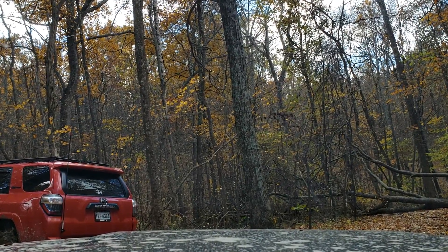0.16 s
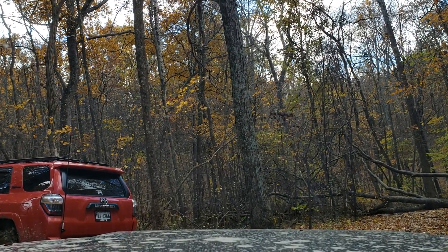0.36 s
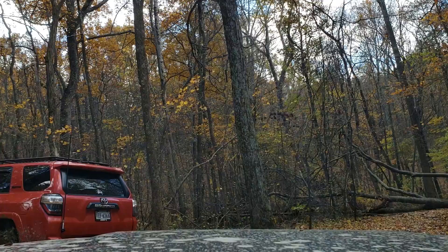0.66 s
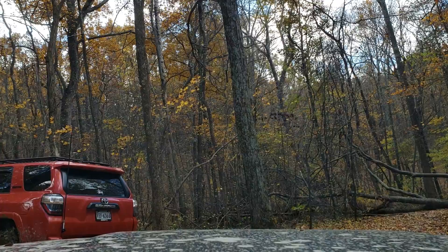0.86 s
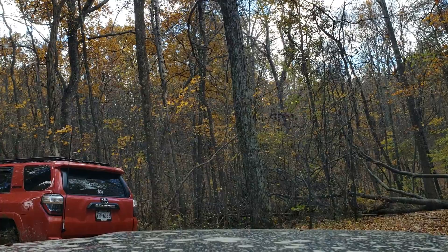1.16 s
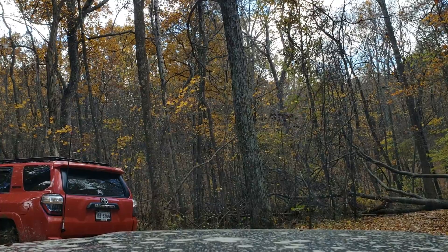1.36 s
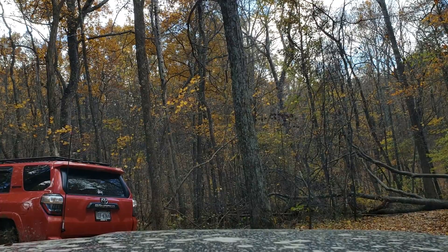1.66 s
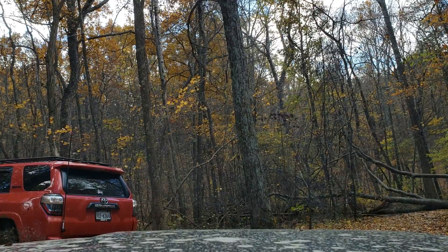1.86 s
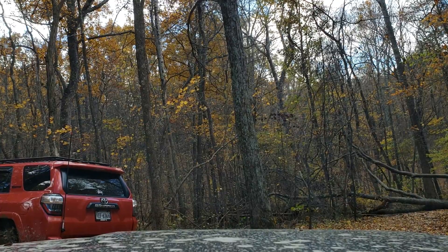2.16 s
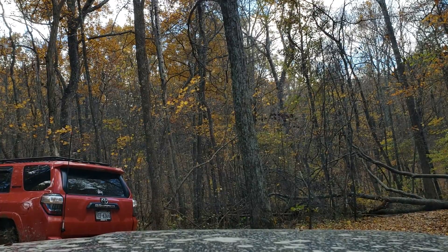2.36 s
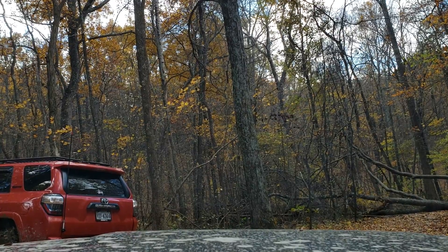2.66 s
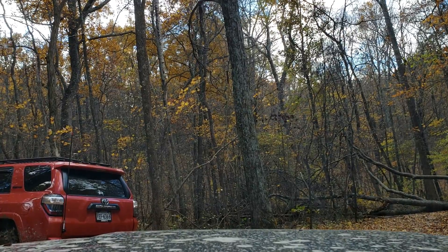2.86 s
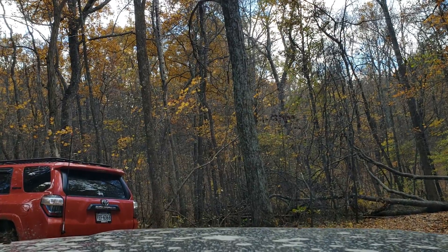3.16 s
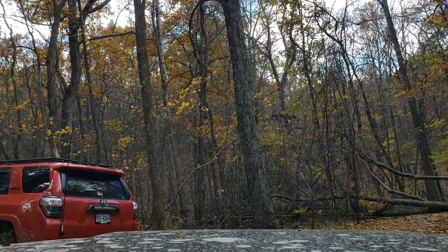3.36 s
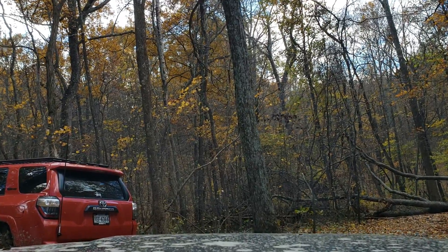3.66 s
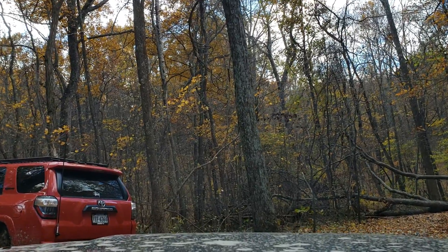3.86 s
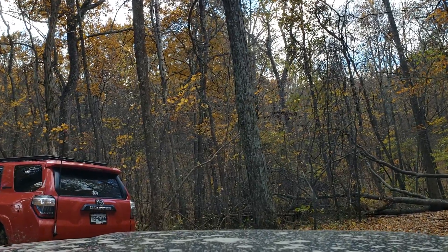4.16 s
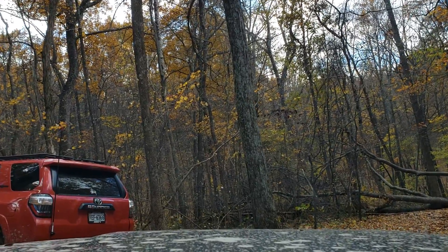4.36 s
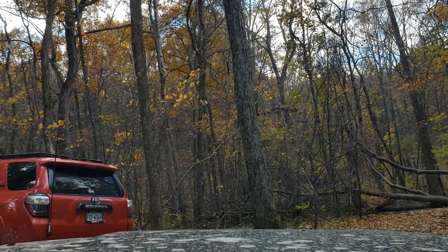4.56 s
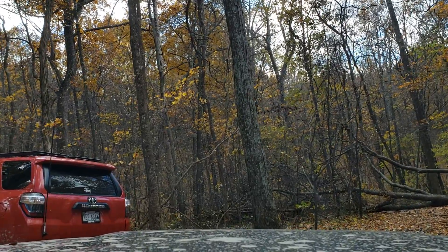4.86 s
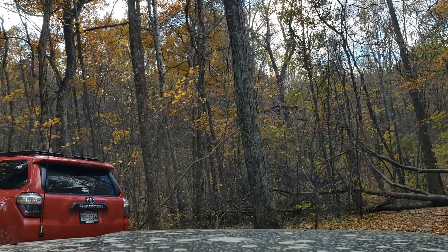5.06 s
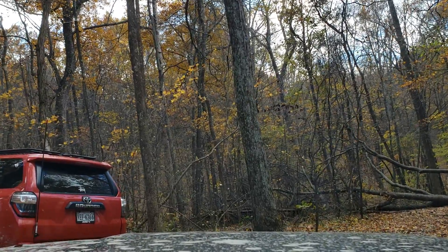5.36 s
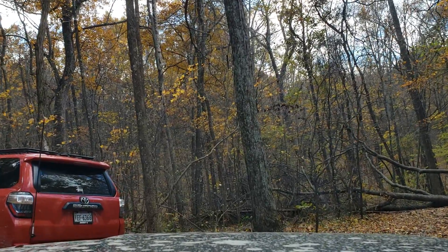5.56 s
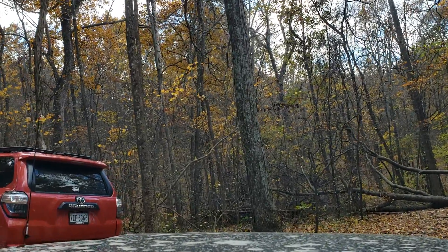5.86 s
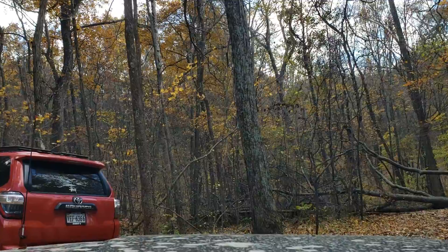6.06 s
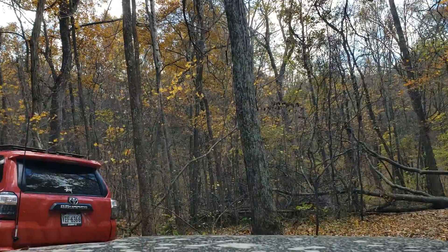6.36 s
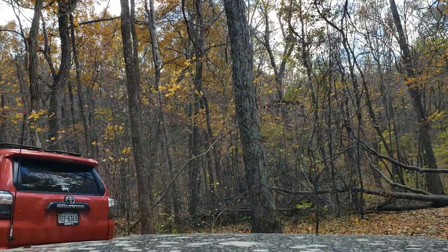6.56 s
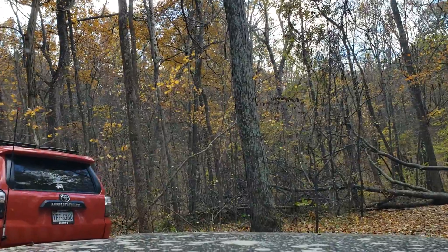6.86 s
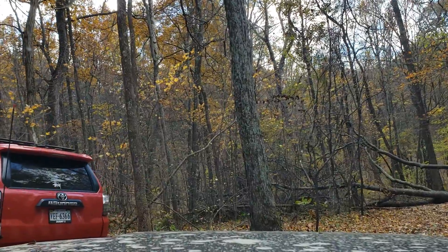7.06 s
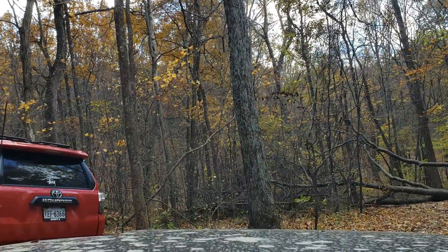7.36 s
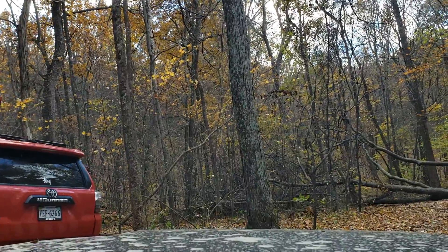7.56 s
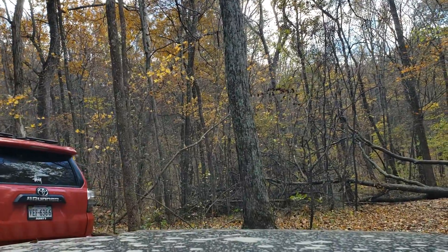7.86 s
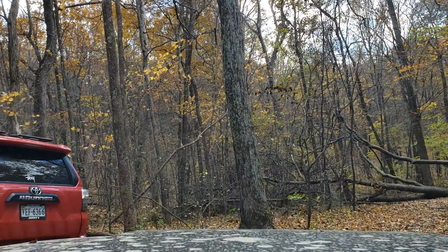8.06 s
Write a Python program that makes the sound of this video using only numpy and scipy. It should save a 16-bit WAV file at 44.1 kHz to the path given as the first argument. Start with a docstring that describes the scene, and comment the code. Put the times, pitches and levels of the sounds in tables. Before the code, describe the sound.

A throbbing idle and rustling clothes, a heavy car door slam near three seconds, then a dull cabin hum with small fading ticks.

```python
"""Inside a car on a forest trail: from the start a six-cylinder engine idles, loud and bright through the open
door, as phase-locked tones, ringing knocks, a faint whine and noise. Cloth rustles (grainy noise), then the trim
is knocked and small parts tick (noise bursts). The door is pulled at 2.3 s and slams at 2.8 s: pressure dips,
ringing shell modes, rattles, a latch ping. The shut cabin keeps the low throb, uneven knocks and whine, with
ever quieter cloth and ticks. Heard at two microphone ports a hand apart."""
import sys
import numpy as np
from scipy import signal
from scipy.fft import rfft, irfft
from scipy.io import wavfile
from scipy.ndimage import uniform_filter1d

SR = 44100
rng = np.random.default_rng(int(sys.argv[2]) if len(sys.argv) > 2 else 0)


def volts(x):
    """Linear amplitude factor 10**(x/20) for a level x in dB, scalar or array-like."""
    e = np.asarray(x, float) / 20
    return 10 ** e


def log_audio(samples):
    """Write samples as a 16-bit WAV file to the path given in sys.argv[1]."""
    # one column per channel
    frames = np.atleast_2d(samples).T
    # limit to full scale, then quantise
    limited = np.clip(frames, -1, 1)
    pcm = np.round(limited * 32767).astype(np.int16)
    wavfile.write(sys.argv[1], SR, pcm)


N = 362502
T = np.arange(N) / SR
HZ = np.fft.rfftfreq(N, 1 / SR)

SHUT_S = 2.79
# left port hears later with the door open, earlier once shut
LAG_OPEN_S, LAG_SHUT_S, LAG_SHUT_HANDLED_S = 0.0004, -0.0004, -0.00012

# engine firing rate: (time [s], rate [Hz])
FIRING_RATE = [(0.0, 38.6), (0.75, 38.31), (2.45, 39.2), (2.65, 37.06), (2.93, 40.3), (3.2, 40.08),
               (3.66, 38.41), (4.3, 37.87), (4.72, 35.83), (5.2, 37.27), (5.72, 36.8), (6.09, 37.47),
               (7.16, 36.43), (7.51, 37.04), (8.22, 37.55)]
# engine loudness: (time [s], throb level [dB], rumble level [dB])
ENGINE_LOAD = [(0.0, -53.5, -42.5), (0.66, -51, -44.5), (1.77, -53, -44.5), (2.4, -50.5, -40.5),
               (2.75, -58.5, -42.5), (3.25, -60.5, -43.5), (3.8, -54, -48.5), (4.05, -53, -43),
               (5.1, -55, -45.5), (6.5, -52, -48.5), (8.22, -52, -47)]
# firing tones, door open: (multiple of firing rate, relative level [dB])
TONES_OPEN = [(0.5, -26), (1, 3.5), (1.5, -5.5), (2, 0.5), (2.5, -16), (3, -8.5), (3.5, -1.5), (4, -16),
              (4.5, -14), (5, -25.5), (5.5, -24), (6, -2), (6.5, -19), (7, 2), (7.5, -24.5), (8, -23.5),
              (8.5, -13.5), (9, -10.5), (9.5, -20), (10, -31.5), (18, -26)]
# firing tones, door shut: (multiple of firing rate, relative level [dB])
TONES_SHUT = [(0.5, -21), (1, 8.5), (1.5, -12), (2, -7.5), (2.5, -21.5), (3, 0.5), (3.5, -12), (4, -14),
              (4.5, -7), (5, -18), (5.5, -16), (6, 0), (6.5, -9), (7, -6), (7.5, -14.5), (8, -5),
              (8.5, -34.5), (9, -9), (9.5, -28.5), (10, -37.5), (18, -21)]
FUNDAMENTAL_SAG_DB_PER_S = -1.5  # tone at the firing rate, after the door shuts
# steady whine tones: (frequency [Hz], level [dB])
WHINE = [(708, -74.5), (2126, -87.5), (4679, -87), (5110, -94), (5528, -89.5), (6380, -88.5), (6806, -90)]
# block modes struck by each firing:
# (frequency [Hz], t60 [s], relative levels of the six cylinders in firing order [dB])
BLOCK_MODES = [(336.8, 0.087, (-46, -55, -56.5, -43.5, -40, -44.5)),
               (703.3, 0.075, (-54.5, -60, -58.5, -58.5, -57, -52.5)),
               (934.5, 0.087, (-63.5, -68.5, -65.5, -50, -65.5, -62.5)),
               (1170, .05, (-74.5, -71, -70, -70.5, -62, -70))]
KNOCK_DB_PER_HZ, IDLE_HZ = -1.5, 37  # knocks soften above idle
# engine rumble spectrum: (frequency [Hz], relative density [dB per Hz])
RUMBLE_SPECTRUM = [(12, -32), (20, 0), (120, -1), (180, -6), (260, -13), (340, -17), (390, -24), (505, -27),
                   (700, -30), (910, -50)]
# engine hiss spectrum, door open: (frequency [Hz], relative density [dB per Hz])
HISS_OPEN_SPECTRUM = [(180, -33), (300, 0), (545, -5), (656, -8), (1020, -5.5), (1700, -10), (2880, -13),
                      (3420, -12.5), (7370, -24), (9000, -23.5), (11700, -59), (19800, -120)]
# engine hiss spectrum, door shut: (frequency [Hz], relative density [dB per Hz])
HISS_SHUT_SPECTRUM = [(300, -18), (420, -2.5), (560, -4.5), (800, -7.5), (1200, -10), (1500, -19),
                      (3000, -32.5), (4000, -59.5)]
HISS_OPEN_DB, HISS_SHUT_DB = -54.5, -64.5
# swelling hum: (middle [s], frequency [Hz], glide [Hz per s], level [dB], length [s])
BOOMS = [(1.701, 134.5, 3, -51, 1), (3.5, 126.3, -3, -40.5, 0.12), (4.099, 119.3, 25.5, -47.5, .3),
         (4.446, 87, -0.5, -50, 0.28), (4.8, 176, 25, -47, 0.65), (5.6, 68.1, -52, -54, 0.54),
         (5.998, 106.3, -2, -46.5, 0.16), (7.151, 140.1, 25, -44.5, 0.48), (7.7, 140.4, 1.5, -48.5, 0.58)]

# background noise spectrum: (frequency [Hz], relative density [dB per Hz])
FLOOR_SPECTRUM = [(1180, -34.5), (2000, -11), (2130, -8), (2300, -10.5), (2800, -11), (4050, -5),
                  (4590, -7.5), (5770, -6), (6700, 1), (8580, -11), (15200, -9), (16100, -19.5),
                  (16500, -30.5)]
FLOOR_DB = -73.5

# cloth spectrum, door open; its treble serves throughout: (frequency [Hz], relative density [dB per Hz])
CLOTH_SPECTRUM = [(710, -34), (1200, -3.5), (1690, -2), (1840, -8), (2700, -1), (3330, -0.5), (4990, -0.5),
                  (6640, -1), (7170, 0), (8170, -6), (9740, -7.5), (11600, -2), (16000, -7.5),
                  (16500, -33.5)]
# cloth nearer the left port, door shut: (frequency [Hz], relative density [dB per Hz])
CLOTH_SHUT_SPECTRUM = [(1060, -25.5), (1800, -5.5), (3320, -7), (4850, -1.5), (5630, -8), (7430, -3),
                       (8940, -11), (15200, -8), (16000, -11), (16500, -31)]
# cloth fidgeting on the seat until it comes to rest: (time [s], level [dB])
FIDGET = [(0.0, -62.5), (.09, -57.5), (.55, -56.5), (.85, -62), (.98, -62.5), (1.22, -58), (1.37, -55),
          (1.66, -58.5), (1.75, -62), (2.05, -55.5), (2.62, -62.5), (2.74, -70), (2.95, -62), (3.02, -68),
          (3.42, -65), (3.73, -73), (3.8, -67.5), (4.0, -66.5), (4.43, -67.5), (4.79, -66), (5.1, -69),
          (5.76, -72.5), (5.86, -93)]
# single strokes of cloth: (start [s], hold [s], level [dB], release by 20 dB [s])
STROKES = [(0.525, .02, -53.5, .05), (0.77, 0.018, -56.5, .05), (1.039, 0.096, -45, 0.039),
           (1.767, 0.2, -52.5, 0.032), (2.166, 0.17, -50.5, 0.6), (2.694, .01, -65, .03),
           (3.007, .015, -59.5, 0.032), (3.08, 0.033, -62, .04), (3.412, 0.028, -57.5, 0.046),
           (3.478, 0.071, -62, 0.15), (4.328, 0.037, -63.5, 0.081), (4.875, 0.065, -61, .06),
           (7.393, 0.082, -75.5, .1), (7.528, 0.031, -74.5, 0.056)]
STROKE_ATTACK_S = 0.03
# door open and shut: treble against body, and left minus right
FIDGET_TOP_DB, STROKE_TOP_DB, CLOTH_PAN_DB = (-3.5, -6.5), (-1, -4), (-0.5, 4.5)

# knocks on the door trim: (time [s], level [dB], tilt about 1 kHz [dB per octave])
TRIM_HITS = [(.089, -38.5, 1.1), (.545, -47, -1.5), (2.221, -46, -6), (2.229, -38.5, -5.5),
             (2.259, -52, -1.5)]
# trim bands: (centre [Hz], width [octaves], relative level [dB], t60 [s], left minus right [dB])
TRIM_BANDS = [(358, 1.3, 0.9, 0.14, 2.8), (1165, 0.55, 5.5, 0.054, .3), (1565, 0.26, -3, 0.068, -2.5),
              (3413, 1.6, -2.2, 0.066, 12.5)]
# small hard parts tick: (time [s], level [dB], centre [Hz], width [octaves], left minus right [dB])
TICKS = [(.665, -38.5, 2650, 1.6, 1), (.798, -46, 7010, 3.1, 5), (1.157, -30.5, 5100, 1.1, 11.5),
         (1.454, -42.5, 3444, 2.28, 1), (1.785, -44, 3260, 0.49, 9), (1.951, -37, 9000, 9.1, -10.5),
         (2.68, -48.5, 4530, 0.82, 14), (2.911, -45, 5450, 4.1, 15), (3.061, -39, 5480, 2.2, 12.5),
         (3.121, -51.5, 5080, 2.6, 10), (3.436, -43.5, 7440, 2.6, 13), (3.45, -47, 538, .5, 2),
         (3.454, -37.5, 5800, 1.5, 16), (3.586, -45, 1350, 2, 10), (3.756, -52, 650, 1.196, 5),
         (3.758, -48.5, 5027, 5.7, 10.5), (3.829, -46.5, 2400, .47, 6), (3.842, -51.5, 4930, 1.21, 11),
         (3.906, -54.5, 6050, 1.61, 9.5), (3.98, -50.5, 3000, 3.02, 7.5), (4.032, -56.5, 4450, 1.5, 13.5),
         (4.351, -47, 6000, 2.1, 13.5), (4.37, -46, 5040, 1.35, 14), (4.41, -54.5, 2850, 1.4, 6),
         (4.776, -51.5, 990, 0.65, 2), (4.864, -54, 8940, 2.66, 14), (5.102, -57, 4480, 1.33, 10),
         (5.514, -58.5, 7090, 2.5, 4.5), (5.821, -64.5, 2502, 2.27, 0)]
TICK_T60_S, TICK_T60_CYCLES = 0.02, 25  # t60 is the sum of both
RISE_S, RISE_CYCLES = 0.00046, 0.84  # burst rise is the sum of both
TOP_HZ, TOP_DB = 7880, (-8.5, 1.5)  # treble gain of the clicks above TOP_HZ, left and right
CABIN_T60_S, CABIN_DB = 0.06, -6

# blows into the body shell: (time [s], relative level [dB], contact time [s])
BLOWS = [(2.276, -21.5, 0.0086), (2.789, -14.5, 0.0026), (2.794, -4.5, .004), (2.802, -3, .004),
         (2.826, -2, .011), (2.873, -16.5, 0.0059), (2.941, -19, 0.0082), (2.995, -28.5, 0.0071),
         (3.066, -21.5, 0.0138)]
# door and cabin air modes: (frequency [Hz], relative level [dB], t60 [s], rise [s])
SHELL_MODES = [(26.64, -13.5, .4, .01), (42.66, -11, 0.2, 0.0067), (76.24, 11, 0.22, 0.11),
               (114.5, -12, 0.16, 0.0017), (150.4, -18, 0.2234, .002), (192, -0.5, 0.14, 0.0042),
               (262.2, -13.5, 0.1274, 0.0014), (321.6, 1, 0.62, 0.0011), (370, -10, 0.11, 0.00055),
               (443.5, -4, 0.09836, 0.00096), (561.7, -17.5, 0.098, 0.0011)]
# door meets seal, latch and frame, then settles: (time [s], level [dB], tilt about 1 kHz [dB per octave])
SLAM_HITS = [(2.759, -26.5, -5.5), (2.766, -29, -6.5), (2.782, -27, 2), (2.792, -17, 1.13),
             (2.8, -20.5, 0.76), (2.815, -32.5, -1.14), (2.84, -42, -2.2), (2.889, -52, -1.5)]
# door panel bands: (centre [Hz], width [octaves], relative level [dB], t60 [s], left minus right [dB])
PANEL_BANDS = [(385.6, 0.55, -8, .12, 1.14), (839.5, 1.6, 2.5, 0.067, 4), (2200, 1.6, -0.3, 0.063, 1.7),
               (2200, 3, -15.5, 0.16, 1.1), (4000, 1.8, -5.1, .045, 14.5), (11440, 0.93, -16.5, 0.062, -3)]
LATCH_S, LATCH_HZ, LATCH_DB, LATCH_T60_S = 2.783, 4330, -8.5, 0.022


def curves(table):
    """Columns of a time table, interpolated at every sample."""
    s, *columns = np.transpose(table)
    return [np.interp(T, s, column) for column in columns]


def walk(rate_hz):
    """Random levels held 1 / rate_hz and slewed twice; spread near 1."""
    hold = int(SR / rate_hz)
    steps = np.repeat(rng.standard_normal(N // hold + 1), hold)
    return 1.24 * uniform_filter1d(uniform_filter1d(steps, hold), hold)[:N]


def sides(pan_db):
    """Left and right gains for a left minus right difference."""
    return volts(np.array([pan_db, -pan_db]) / 2)


def noise(spectrum, alike_hz, alike_top, grit=1, lo_hz=0, hi_hz=SR):
    """Coloured noise at both ports, joint rms 1: alike in the bass, less so above; grit makes grains."""
    hz, db = np.transpose(spectrum)
    gain = volts(np.interp(np.log(HZ + 1), np.log(hz), db, left=-90, right=-90))
    gain = gain * (HZ >= lo_hz) * (HZ < hi_hz)
    alike = np.clip(alike_top + (1 - alike_top) / (1 + (HZ / alike_hz) ** 2), 0, 1)
    a, b = rfft(rng.standard_normal((2, N)) * grit) * gain
    out = irfft([alike * a + np.sqrt(1 - alike ** 2) * b, a], N)
    return out / np.sqrt(np.mean(out ** 2))


def ring(strikes, hz, db, t60_s, rise_s=0.001):
    """Strikes ring a decaying sine mode."""
    t = T[:SR]
    decay = np.exp(-np.log(1000) * t / t60_s)
    rise = 1 - np.exp(-(t / rise_s) ** 2)
    mode = volts(db) * np.sin(2 * np.pi * hz * t) * decay * rise
    return signal.fftconvolve(strikes, mode)[:N]


def ports(x, lag_shut_s=LAG_SHUT_S):
    """Delays the left port; the lag crossfades when the door stops letting sound in."""
    shut = np.clip((T - SHUT_S - 0.06) / 0.0092, 0, 1)
    left = 0
    for share, lag_s in [(1 - shut, LAG_OPEN_S), (shut, lag_shut_s)]:
        left = left + irfft(rfft(x[0] * share) * np.exp(-2j * np.pi * HZ * lag_s), N)
    return np.array([left, x[1]])


def engine():
    """Firing phase drives throb, knocks and rumble; whine, hiss and hum run free of it."""
    (firing_hz,), (throb_db, rumble_db) = curves(FIRING_RATE), curves(ENGINE_LOAD)
    phase = 2 * np.pi * np.cumsum(firing_hz) / SR
    shut = np.clip((T - SHUT_S) / 0.04655 + 1, 0, 1)
    tonal = throb(phase, shut) * volts(throb_db) + whine() + boom()
    tonal = tonal + knocks(phase) * volts(KNOCK_DB_PER_HZ * (firing_hz - IDLE_HZ))
    return (tonal + rumble(phase) * volts(rumble_db) + hiss(shut)) * sides(1.6)[:, None]


def throb(phase, shut):
    """Tones at half multiples of the firing rate start in step as a pulse; uneven firing wavers each."""
    out = 0
    for (multiple, open_db), (_, shut_db) in zip(TONES_OPEN, TONES_SHUT):
        db = open_db + shut * (shut_db - open_db) + 1.2 * walk(5)
        if multiple == 1:
            db = db + FUNDAMENTAL_SAG_DB_PER_S * np.clip(T - SHUT_S, 0, None)
        out = out - volts(db) * np.cos(multiple * phase + 0.04 * multiple * walk(6))
    return out


def whine():
    """Fixed tones, wavering in level and phase."""
    return sum(volts(db + 1.53 * walk(16)) * np.cos(2 * np.pi * hz * T + 1.34 * walk(27)) for hz, db in WHINE)


def knocks(phase):
    """One strike per firing; each cylinder has its own strength on each block mode."""
    count = np.floor(phase / (2 * np.pi) - 0.3)
    fired, cylinder = np.diff(count, prepend=0), count.astype(int) % 6
    out = 0
    for hz, t60_s, cylinder_db in BLOCK_MODES:
        strikes = fired * volts(np.array(cylinder_db)[cylinder] + 0.81 * walk(30))
        out = out + ring(strikes, hz, 2.3, t60_s, rise_s=0.0068)
    return out


def rumble(phase):
    """Low noise pulsing once per firing."""
    return noise(RUMBLE_SPECTRUM, 440, 0.82) * (1 + 0.28 * np.cos(phase))


def hiss(shut):
    """Steady noise, crossfading from bright to dull and quieter as the door shuts."""
    bright = noise(HISS_OPEN_SPECTRUM, 620, 0.098) * volts(HISS_OPEN_DB)
    dull = noise(HISS_SHUT_SPECTRUM, 750, 0.13) * volts(HISS_SHUT_DB)
    return (1 - shut) * bright + shut * dull


def background():
    """Steady background noise."""
    return volts(FLOOR_DB) * noise(FLOOR_SPECTRUM, 1000, 0.074) * sides(3.065)[:, None]


def rustle():
    """Dense fibre slips, a few standing out: fidgeting plus strokes that swell, hold and die away."""
    shut = (T > SHUT_S).astype(int)
    fidget_power = volts(curves(FIDGET)[0]) ** 2
    stroke_power = 0
    for start_s, hold_s, db, release_s in STROKES:
        t = T - start_s
        swell = np.clip(t / STROKE_ATTACK_S, 0, 1) ** 2
        fade = np.exp(-np.clip(t - STROKE_ATTACK_S - hold_s, 0, None) * np.log(10) / release_s)
        stroke_power = stroke_power + (volts(db) * swell * fade) ** 2
    slips = np.repeat(rng.exponential(size=N // 64 + 1), 64)[:N]
    grit = volts(1.6 * uniform_filter1d(slips, size=48))
    body_open = noise(CLOTH_SPECTRUM, 1200, 0.07, grit, hi_hz=TOP_HZ)
    body_shut = noise(CLOTH_SHUT_SPECTRUM, 1500, 0.1, grit, hi_hz=TOP_HZ)
    body = np.where(shut, body_shut, body_open)
    top = noise(CLOTH_SPECTRUM, 1500, 0.071, grit, lo_hz=TOP_HZ)
    top_power = fidget_power * volts(FIDGET_TOP_DB)[shut] ** 2 + stroke_power * volts(STROKE_TOP_DB)[shut] ** 2
    cloth = np.sqrt(fidget_power + stroke_power) * body + np.sqrt(top_power) * top
    return cloth * sides(np.array(CLOTH_PAN_DB)[shut])


def struck(hits, bands):
    """Every hit rattles every band of the body; tilt makes it brighter or duller."""
    return [(s, db + band_db + tilt_db * np.log2(hz / 1000), hz, octaves, pan_db, t60_s)
            for s, db, tilt_db in hits for hz, octaves, band_db, t60_s, pan_db in bands]


def clicks():
    """Trim knocks, ticks and slam rattles: decaying noise bursts round a centre pitch."""
    out = np.zeros((2, N))
    size = 8192
    t = T[:size]
    hz = np.fft.rfftfreq(size, 1 / SR) + 1
    rows = struck(TRIM_HITS, TRIM_BANDS) + struck(SLAM_HITS, PANEL_BANDS)
    for s, db, centre_hz, octaves, pan_db in TICKS:
        rows.append((s, db, centre_hz, octaves, pan_db, TICK_T60_S + TICK_T60_CYCLES / centre_hz))
    for s, db, centre_hz, octaves, pan_db, t60_s in rows:
        band_gain = 1 / (1 + (2 * np.log2(hz / centre_hz) / max(octaves, 0.1)) ** 4)
        rattle = irfft(rfft(rng.standard_normal(size)) * band_gain)
        contact = np.roll(irfft(band_gain), 24)  # one sharp tick
        decay = np.exp(-np.log(1000) * t / t60_s)
        rise = np.minimum(t / (RISE_S + RISE_CYCLES / centre_hz), 1)
        burst = (rattle / rattle.std() + 2 * contact / contact.max()) * decay * rise
        i = int(s * SR)
        out[:, i:i + size] += volts(db) * burst * sides(pan_db)[:, None]
    return out


def port_treble(x):
    """Treble step at each port: left duller, right slightly brighter."""
    return irfft(rfft(x) * volts(np.outer(TOP_DB, HZ > TOP_HZ)), N)


def cabin(x):
    """Short dense reflections, different at each port."""
    t = T[:SR // 4]
    tail = rng.standard_normal((2, len(t))) * np.exp(-np.log(1000) * t / CABIN_T60_S) * (t > 0.001)
    tail /= np.sqrt(np.sum(tail ** 2, axis=1, keepdims=True))
    return x + volts(CABIN_DB) * signal.fftconvolve(x, tail, axes=1)[:, :N]


def boom():
    """Wavering, gliding low tones that swell and fade."""
    out = 0
    for middle_s, hz, glide_hz_per_s, db, length_s in BOOMS:
        t = T - middle_s
        swell = volts(db + 1.6 * walk(7.6)) * np.exp(-(2 * t / length_s) ** 2)
        out = out + swell * np.cos(2 * np.pi * (hz + glide_hz_per_s * t / 2) * t + 0.5 * walk(22))
    return out


def door():
    """Each blow is a pressure dip that also rings the shell; longer contact sounds duller."""
    dips, force = np.zeros(N), np.zeros(N)
    for s, db, contact_s in BLOWS:
        push = np.sin(np.pi * np.clip((T - s) / contact_s, 0, 1)) ** 2
        dips -= volts(db) * push
        force -= volts(db) * push / push.sum()
    out = dips * volts(-2.5)
    for k, mode in enumerate(SHELL_MODES):
        # above the two deepest, neighbouring modes lean to opposite ports
        pan_db = 2.5 * (-1) ** k * (k > 1)
        out = out + ring(force, *mode) * sides(pan_db)[:, None]
    return out


def latch():
    """The steel latch snaps: one impulse rings one mode."""
    snap = (np.arange(N) == round(LATCH_S * SR)).astype(float)
    return ring(snap, LATCH_HZ, LATCH_DB, LATCH_T60_S, rise_s=RISE_S)


def scene():
    """Sums all sources at the two ports."""
    outer = engine() + background() + door()
    # once the door is shut, handled things reach both ports almost together
    handled = rustle() + cabin(port_treble(clicks() + latch()))
    return ports(outer) + ports(handled, LAG_SHUT_HANDLED_S)


def low_pass(x):
    """Removes everything above the highest recorded frequency."""
    return signal.sosfilt(signal.butter(12, 16640, fs=SR, output="sos"), x)


def record(dry):
    """The microphones lose the deepest bass and round the loudest peaks."""
    x = signal.sosfilt(signal.butter(2, 18, "high", fs=SR, output="sos"), dry)
    mix = np.tanh(x * 1.224) / 1.01
    return low_pass(mix)


dry = scene()
out = record(dry)
log_audio(out)
```